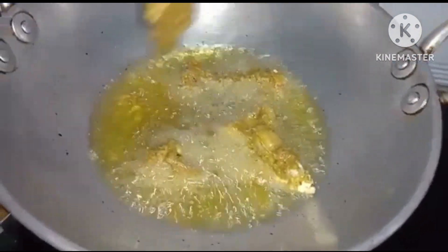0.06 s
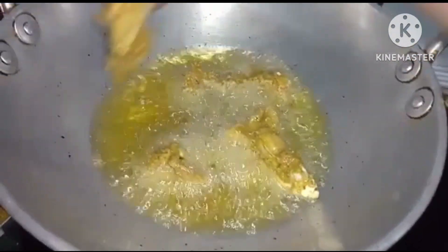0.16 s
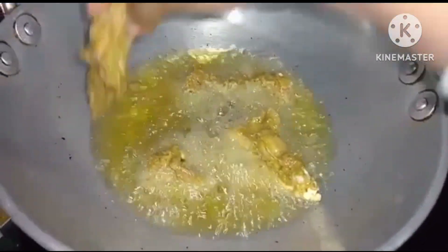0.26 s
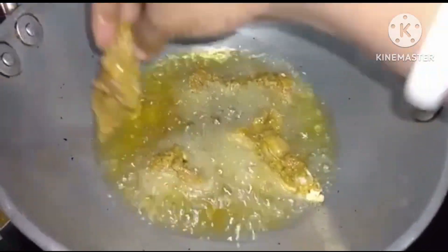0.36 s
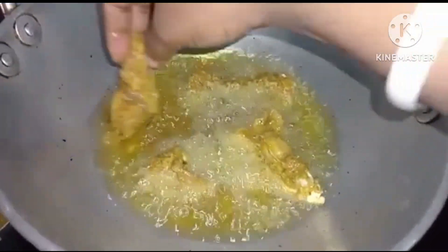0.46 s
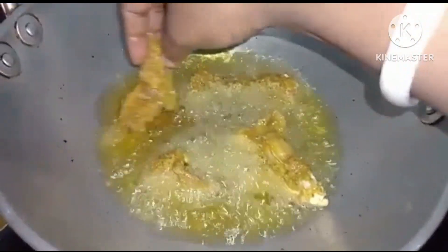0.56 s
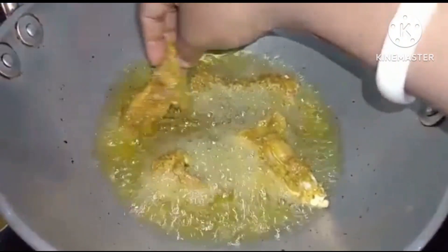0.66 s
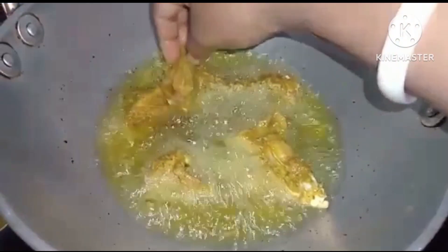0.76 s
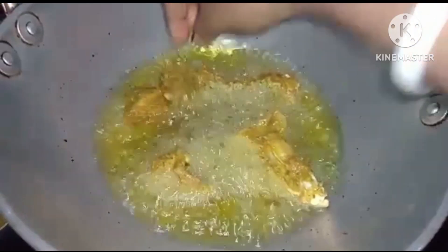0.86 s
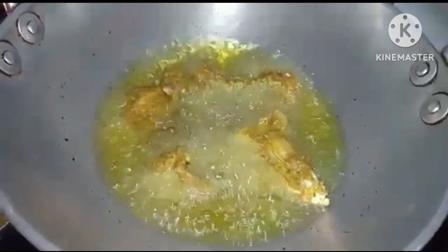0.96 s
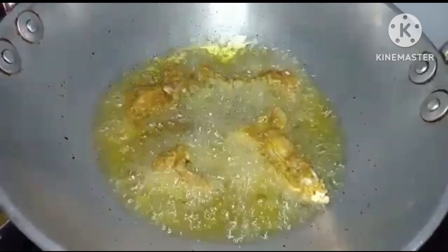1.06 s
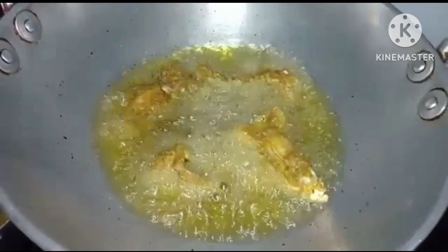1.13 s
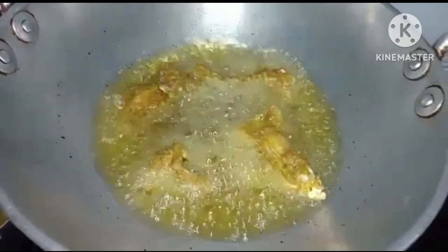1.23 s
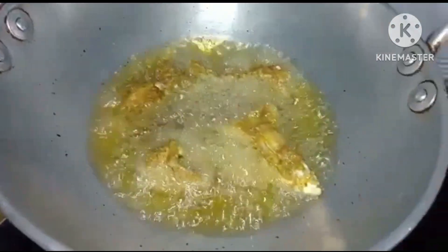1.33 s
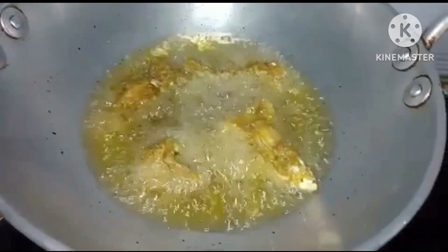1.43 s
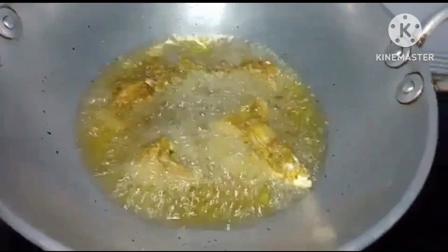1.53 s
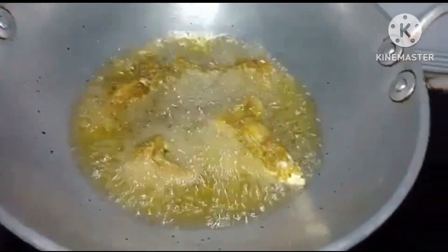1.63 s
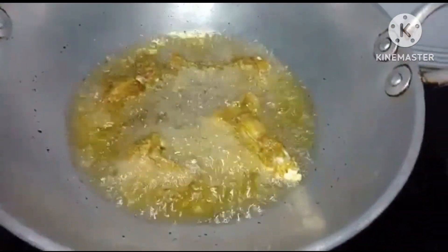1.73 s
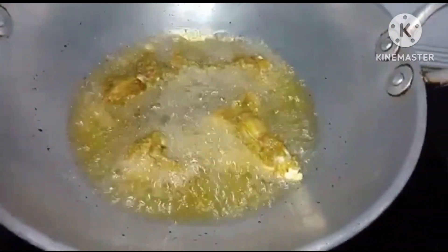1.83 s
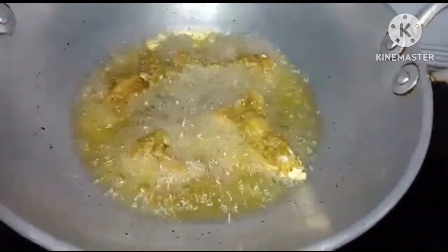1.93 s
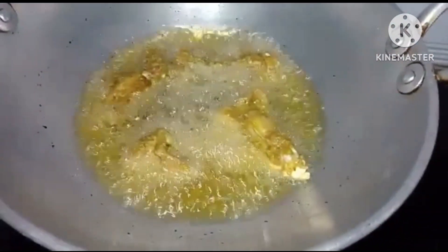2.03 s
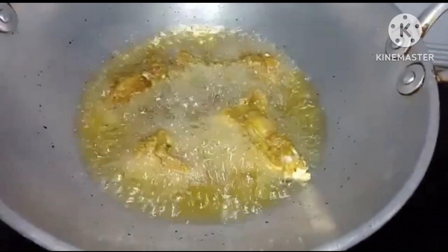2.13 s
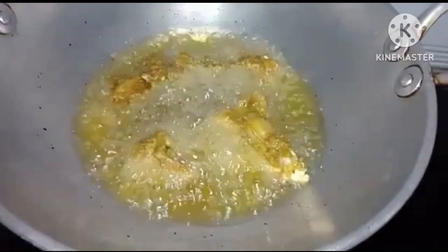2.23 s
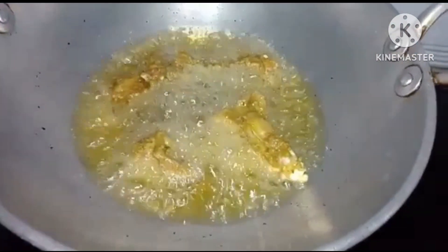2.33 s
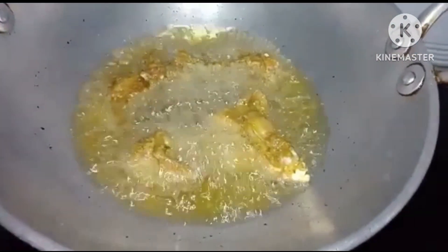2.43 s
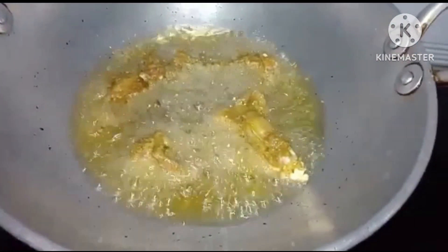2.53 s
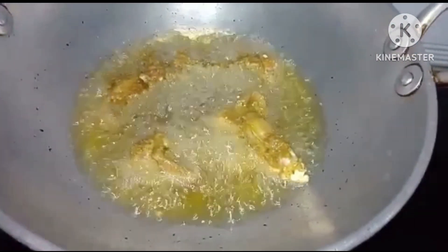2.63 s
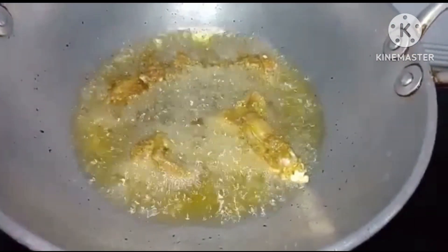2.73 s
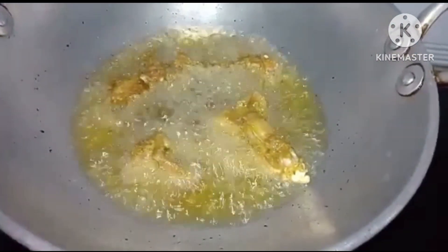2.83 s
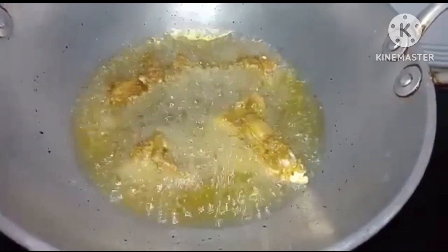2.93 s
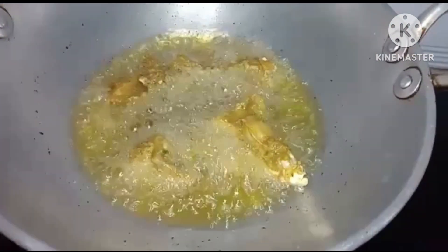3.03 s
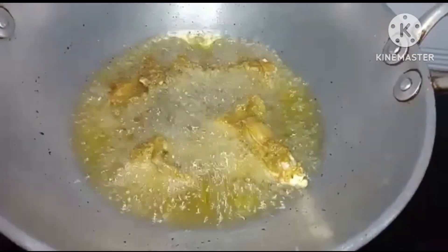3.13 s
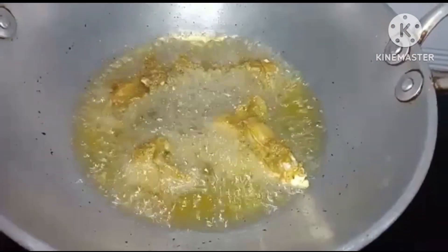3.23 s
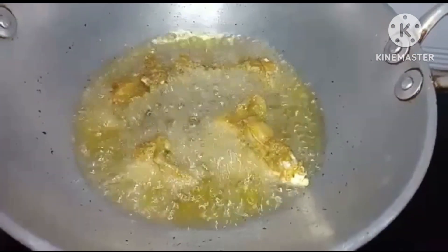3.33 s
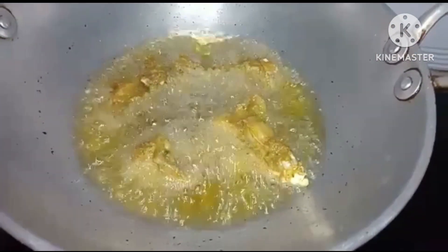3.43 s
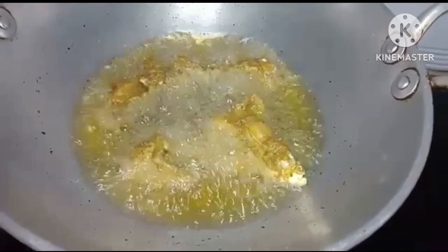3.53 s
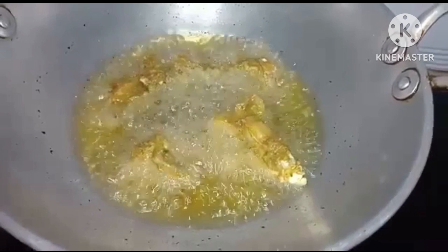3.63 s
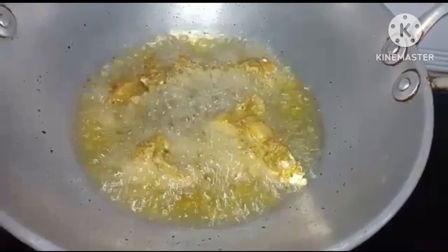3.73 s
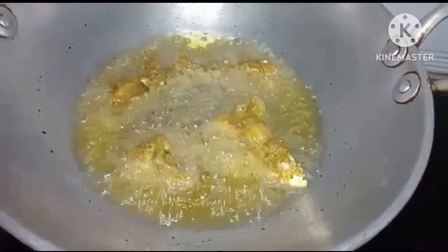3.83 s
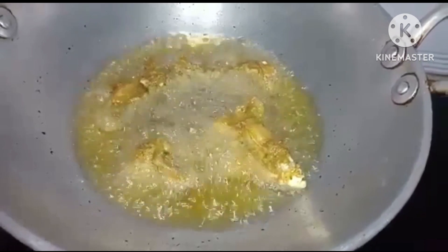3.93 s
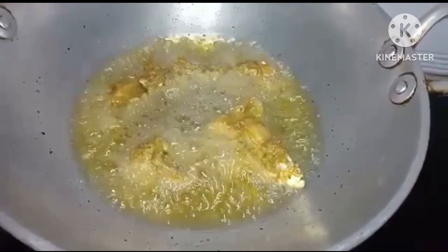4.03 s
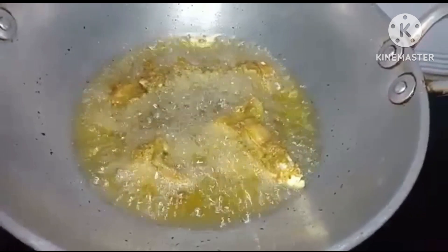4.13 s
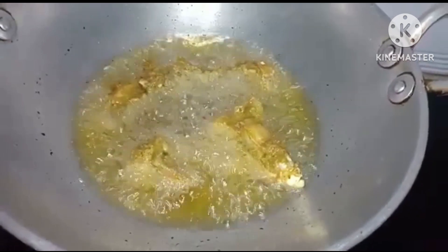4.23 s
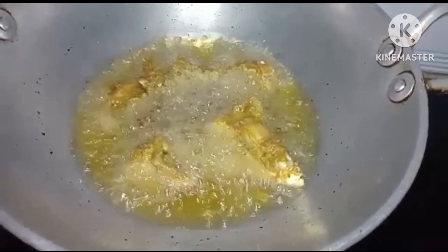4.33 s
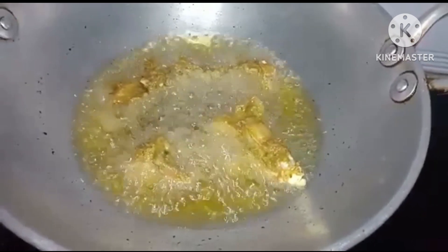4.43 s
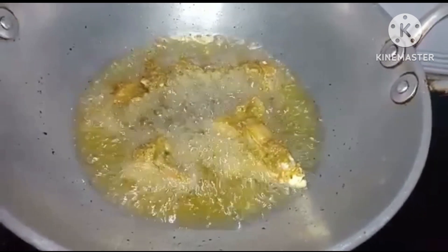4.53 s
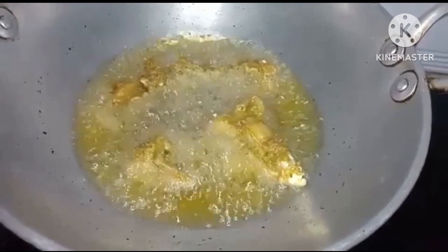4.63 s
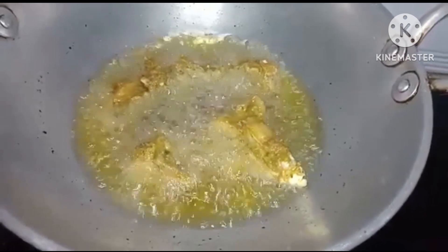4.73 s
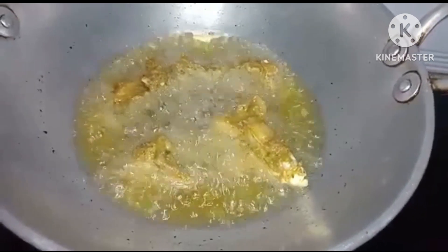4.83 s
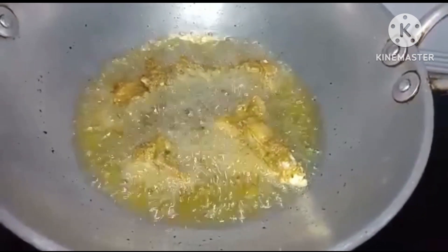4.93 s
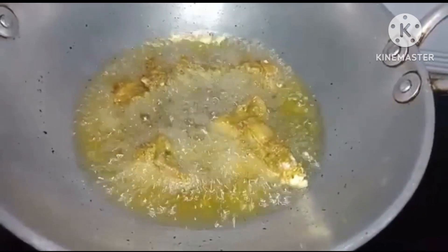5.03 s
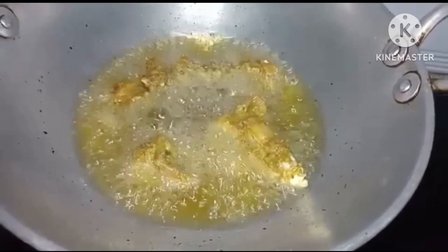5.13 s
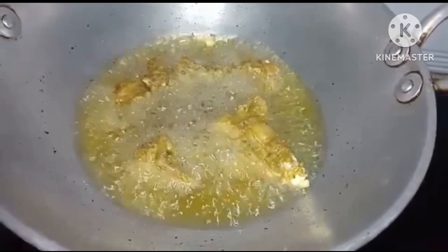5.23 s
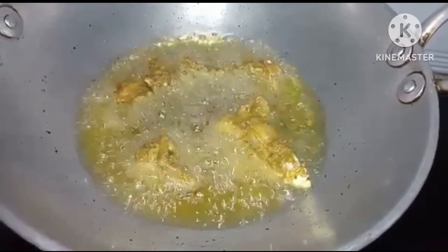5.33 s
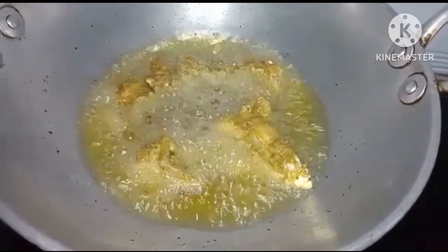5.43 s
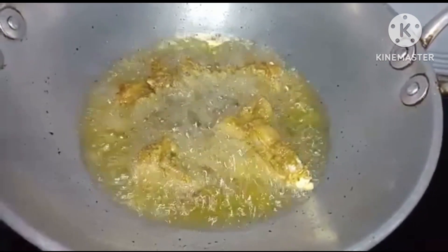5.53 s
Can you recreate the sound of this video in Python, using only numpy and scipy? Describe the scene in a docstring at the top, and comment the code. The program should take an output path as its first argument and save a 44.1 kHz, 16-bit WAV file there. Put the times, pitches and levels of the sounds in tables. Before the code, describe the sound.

Chicken pieces fry in hot oil in a metal wok with dense, bright sizzling and crackling, surging as a fresh piece goes in.

```python
"""A small kitchen, close to a metal wok: chicken fries, and a fresh piece laid in at half a second makes the sizzle surge.
Steam bubbles burst in the oil: countless tiny ones are filtered clicks that crackle, larger ones are gliding pings,
and now and then a water drop spits. Dense grains make the steam's sputter. The boiling keeps the wok's modes humming
faintly, and it takes a few dull knocks. Close walls add a short tail; the phone microphone limits the loudest pops."""
import sys
import numpy as np
from scipy import signal
from scipy.fft import rfft, irfft
from scipy.io import wavfile
from scipy.ndimage import uniform_filter1d, minimum_filter1d

SR = 44100
rng = np.random.default_rng(int(sys.argv[2]) if len(sys.argv) > 2 else 0)


def waveform_to_disk(signal):
    """Save audio, clipped to [-1, 1], as 16-bit WAV at the path in sys.argv[1]."""
    frames = np.transpose(np.atleast_2d(signal))
    scaled = np.clip(frames, -1, 1) * 32767
    samples = np.round(scaled).astype(np.int16)
    wavfile.write(sys.argv[1], SR, samples)


N = 246519
TIME = np.arange(N) / SR

# Low background of stove and kitchen: (frequency [Hz], relative level [dB])
KITCHEN_COLOUR = [(25, -1), (55, -3.5), (90, -3), (130, 2), (210, -8.5), (320, 9.5), (420, -1), (600, 8),
                  (1200, -12.5), (3000, -8)]
# Ringing modes of the wok: (frequency [Hz], relative level [dB], decay by 60 dB [s])
WOK_MODES = [(123, -11.5, 0.28), (159.3, -9.5, 0.44), (318, -7.5, 0.25), (415.3, 4, 0.25), (550, -20, 0.15),
             (705, -0.5, 0.13), (814, -15, 0.13), (876, 5.5, 0.13), (1130, -11, 0.36)]
# Dull body of a knock: (frequency [Hz], relative level [dB])
THUD_COLOUR = [(30, -5), (100, -26), (400, 6), (1100, -2), (1400, -26), (6000, -57)]
# Dull knocks on the wok: (time [s], relative level [dB], contact time [ms])
WOK_KNOCKS = [(0.925, -41, 6.3), (0.974, -47, 6.7), (3.011, -45, 5.4), (3.666, -45.5, 1.6),
              (4.312, -46, 0.49), (4.427, -34, 0.66)]
# Swells of the wok's singing mode, before their random spread: (time [s], level [dB])
SINGING_LEVEL = [(0, -56), (0.8, -38.5), (1.3, -42), (1.7, -54.5), (2.2, -36), (2.5, -55), (3.95, -42.5),
                 (4.5, -60), (5.59, -43.5)]
# Wide, low bubbles gulping at the edge of the meat: (time [s], pitch [Hz], peak level [dB])
EDGE_GULPS = [(0.198, 1520, -36.5), (.212, 1160, -43), (1.505, 1184, -43.5), (2.995, 1470, -36),
              (3.003, 2070, -32.5), (4.835, 1840, -39)]
# Water drops spitting: (time [s], relative level [dB])
WATER_SPITS = [(0.379, -23), (1.749, -17), (1.778, -31), (2.673, -18), (2.775, -23), (2.817, -27),
               (3.4, -24), (4.615, -22), (4.782, -27)]
# Colour of a spit: (frequency [Hz], relative level [dB])
SPIT_COLOUR = [(500, -26), (2000, -10), (3200, 0), (6000, -2), (8000, -6), (10000, -2), (12500, -4),
               (15500, -6)]
# Loudest steam bubbles bursting: (time [s], pitch [Hz], relative ring level [dB], relative spray level [dB])
LOUD_POPS = [(0.078, 4200, -15.5, -22), (0.11, 6570, -24, -36), (0.137, 3480, -17, -24),
             (0.15, 4910, -16.5, -39), (0.273, 4630, -18, -28), (0.381, 4920, -17, -34),
             (0.393, 4520, -14, -30), (0.406, 3680, -12, -17.5), (0.468, 3410, -16.5, -28),
             (0.589, 2650, -15.5, -17.5), (0.605, 4280, -20, -19), (0.779, 3810, -13, -24),
             (0.869, 4980, -11.5, -22.5), (0.895, 4230, -14.5, -37), (1.01, 5620, -11, -31),
             (1.103, 3080, -17, -25.5), (1.295, 2794, -15.5, -29), (1.601, 4440, -23, -34),
             (1.721, 3070, -9, -30), (1.75, 3370, -17, -32), (1.828, 4060, -27, -32),
             (2.041, 5600, -18.5, -29), (2.179, 2820, -17, -24.5), (2.197, 4410, -16, -35),
             (2.358, 4190, -21.5, -52), (2.475, 6300, -18.5, -20), (2.715, 3040, -14, -22),
             (2.962, 6030, -27, -30.5), (3.144, 3970, -13.5, -25.5), (3.183, 5400, -28, -21.5),
             (3.389, 3490, -27, -26.5), (3.526, 5370, -15.5, -26.5), (3.857, 3290, -23, -48),
             (4.131, 2830, -10.5, -49), (4.223, 6630, -25.5, -24), (4.311, 4910, -17.5, -21.5),
             (4.45, 3680, -18, -19.5), (4.545, 3100, -17, -24.5), (4.645, 3580, -25.5, -32),
             (4.87, 4260, -22, -32.5), (4.885, 2940, -13, -42), (4.955, 4090, -27, -32),
             (5.217, 3030, -20.5, -45), (5.247, 3340, -21.5, -28), (5.295, 6220, -19.5, -49),
             (5.537, 2720, -18, -42)]
# Colour of the sputter and of a pop's spray: (frequency [Hz], relative level [dB])
SPUTTER_COLOUR = [(1000, -40), (1900, -30), (2600, 3), (3600, 4), (4700, 8.5), (5800, 0.5), (6600, 1),
                  (7300, -8), (8200, -14), (15000, -46)]
# Gushes of steam as the wet piece sinks in: (time [s], relative level [dB])
STEAM_GUSHES = [(0.485, -21), (0.68, -22), (0.945, -25)]
# Size classes of the tiny bursts: (low edge [Hz], high edge before the cap in crackle [Hz], size spread [dB])
FOAM_CLASSES = [(100, 8140, 3.5), (7400, 14200, 5), (12500, 22000, 5.5)]
# Colour of the crackle: (frequency [Hz], relative level [dB])
CRACKLE_COLOUR = [(100, -48), (600, -21), (1200, -18.5), (2000, -8.5), (2500, -2), (3000, 3.5),
                  (3800, -4.5), (4700, -7), (6500, -22.5), (8200, -24.5), (10100, -9.5), (12300, -29),
                  (13800, -36), (15200, -23.5)]

# The lesser pops fall at random; ring and spray levels are relative, like those of the loud pops
LESSER_LOW_HZ, LESSER_HIGH_HZ = 2654, 6830
LESSER_DB, LESSER_SPRAY_DB, LESSER_SPREAD_DB = -27.5, -36.5, 5
# The fine crackle peaks once the fresh piece is in, then eases as the oil cools (relative level)
BOIL_DB, BOIL_PEAK_S, BOIL_RISE_DB_PER_S, BOIL_FALL_DB_PER_S = -44, 0.63, 7, 1.39
GUSH_ATTACK_S, GUSH_DECAY_S = 0.021, 0.09
DRYING_DB, DRYING_S = -12, 1.0  # what remains of a gush while the surface of the meat dries
STEAM_DB = -43.5  # relative level of the steady sputter of pieces already frying
TOP_HZ = 15600  # top of the microphone's range


def undb(db):
    """Decibels to gain."""
    return 10 ** (np.asarray(db) / 20)


def unit(x):
    """Scale to rms 1."""
    return x / np.sqrt(np.mean(x ** 2))


def curve(table, axis=1):
    """One column of a control table, joined by straight lines."""
    rows = np.array(table)
    return np.interp(TIME, rows[:, 0], rows[:, axis])


def add(out, s, sound):
    """Mix a sound in at time s."""
    start = min(max(int(s * SR), 0), N)
    out[start:start + len(sound)] += sound[:N - start]


def colour(x, points, size=1024):
    """Causal, minimum-phase filter with the given (Hz, dB) response."""
    hz, db = np.transpose(points)
    grid = np.maximum(np.arange(size // 2 + 1) * SR / size, 1)
    response_db = np.interp(np.log(grid), np.log(hz), db)
    cepstrum = irfft(np.log(undb(response_db)))
    # folding the cepstrum forward puts the energy as early as possible
    cepstrum[1:size // 2] *= 2
    cepstrum[size // 2 + 1:] = 0
    impulse = irfft(np.exp(rfft(cepstrum)))
    return signal.oaconvolve(x, impulse)[:len(x)]


def walk(rate, size=2048):
    """A random wander with a spread near 1: straight lines between `rate` random points a second."""
    return np.interp(TIME * rate, np.arange(size), rng.standard_normal(size))


def clicks(spread_db, count):
    """Randomly timed bursts of very unequal size and random sign."""
    when, size, sign = rng.random((count, 3)).T
    height = undb(spread_db * np.minimum(-np.log(size), 6.5)) * np.sign(sign - .5)
    return np.bincount((when * N).astype(int), height, N)


def ping(hz, cycles, glide, rise_s=0.0018):
    """A burst bubble's cavity rings for some cycles; its pitch rises as the hole opens."""
    life = cycles / hz
    t = TIME[:int(5 * life * SR)]
    swell = (1 - np.exp(-t / rise_s)) * np.exp(-(t / life) ** 1.21)
    pitch = hz * (1 + glide * (np.tanh(t / life) - .5))
    phase = 2 * np.pi * np.cumsum(pitch) / SR
    return swell / swell.max() * np.sin(phase)


def boil():
    """How hard the oil boils, in dB: a short rise, then a slow fall."""
    since = TIME - BOIL_PEAK_S
    return BOIL_DB + np.minimum(BOIL_RISE_DB_PER_S * since, -BOIL_FALL_DB_PER_S * since)


def kitchen(level_db=-61.5):
    """The low background of stove and kitchen is steady coloured noise."""
    noise = colour(rng.standard_normal(N), KITCHEN_COLOUR, size=8192)
    return undb(level_db) * unit(noise)


def wok(boil_db=-62, swell_db=6, thud_db=-1, thud_s=0.031):
    """The wok's modes ring under knocks and, faintly, under the boiling oil, where each swells on its own."""
    t = TIME[:SR]
    modes = [undb(db) * np.cos(2 * np.pi * hz * t) * undb(-60 * t / t60) for hz, db, t60 in WOK_MODES]
    thud = unit(colour(rng.standard_normal(SR), THUD_COLOUR)) * np.exp(-t / thud_s)
    blows = np.zeros(N)
    for s, db, contact_ms in WOK_KNOCKS:
        push = np.hanning(max(int(contact_ms * SR / 1000), 3))
        add(blows, s, undb(db) * push / push.sum())
    knocks = signal.oaconvolve(blows, sum(modes) + undb(thud_db) * thud)[:N]
    hum = np.zeros(N)
    for mode in modes:
        drive = rng.standard_normal(N) * undb(swell_db * walk(12))
        hum += signal.oaconvolve(drive, mode)[:N]
    return knocks + undb(boil_db) * unit(hum)


def singing(hz=892, width_hz=35, steady_db=-59, swell_s=0.082, spread_db=3, waver=0.01174, count=26):
    """One narrow mode of the bowl sings under the boil; now and then it swells for a moment."""
    b, a = signal.iirpeak(hz, hz / width_hz, fs=SR)
    steady = undb(steady_db) * unit(signal.lfilter(b, a, rng.standard_normal(N)))
    swells = np.zeros(N)
    for k, (when, length, size) in enumerate(rng.random((count, 3))):
        swell = np.hanning(int(swell_s * (.5 + length) * SR))
        add(swells, (k + when) / count * TIME[-1], undb(spread_db * (2 * size - 1)) * swell)
    phase = 2 * np.pi * np.cumsum(hz * (1 + waver * walk(40))) / SR
    return steady + undb(curve(SINGING_LEVEL)) * swells * np.sin(phase)


def simmer(low_hz=650, high_hz=2000, cycles=14, spread_db=2.0, tilt_db=5, count=400):
    """Slow, soft bubbling from deep in the oil: low pings with a gentle onset."""
    out = np.zeros(N)
    for when, pitch, size in rng.random((count, 3)):
        db = spread_db * min(-np.log(size), 3.0) + tilt_db * pitch
        hz = low_hz * (high_hz / low_hz) ** pitch
        add(out, when * N / SR, undb(db) * ping(hz, cycles, 0.051, rise_s=0.0085))
    return unit(out)


def gulps(cycles=12, again_db=-5, again_s=0.02, count=3):
    """Wide bubbles ring lower and softer, and wobble again as they collapse."""
    out = np.zeros(N)
    for (s, hz, db), chance in zip(EDGE_GULPS, rng.random((len(EDGE_GULPS), count, 2))):
        add(out, s, undb(db) * ping(hz, cycles, 0.044))
        for lag, pitch in chance:
            wobble = ping(hz * (.85 + .3 * pitch), cycles / 2, 0.035)
            add(out, s + again_s * (0.25 + lag), undb(db + again_db) * wobble)
    return out


def spits(hiss_db=-6, hiss_s=0.0035):
    """A water drop flashes to steam with one sharp crack and a brief hiss."""
    out, t = np.zeros(N), TIME[:SR // 20]
    crack = t == 0  # a single-sample impulse
    for s, db in WATER_SPITS:
        hiss = rng.standard_normal(len(t)) * np.exp(-t / hiss_s)
        add(out, s, undb(db) * (crack + undb(hiss_db) * hiss / np.linalg.norm(hiss)))
    return colour(out, SPIT_COLOUR)


def lesser_pops(count=56):
    """Rows like those of the loud pops, at random moments and weaker as the boil eases."""
    when, pitch, size, wetness = rng.random((count, 4)).T
    s = (np.arange(count) + when) / count * TIME[-1]
    level = boil()
    vigour_db = np.interp(s, TIME, level - level.mean())
    hz = LESSER_LOW_HZ * (LESSER_HIGH_HZ / LESSER_LOW_HZ) ** pitch
    db = LESSER_DB + vigour_db + LESSER_SPREAD_DB * (2 * size - 1)
    spray_db = LESSER_SPRAY_DB + vigour_db + LESSER_SPREAD_DB * (2 * wetness - 1)
    return list(zip(s, hz, db, spray_db))


def pops(cycles=9, glide=0.062, rings_db=3, spray_db=4, spray_s=0.0058,
         follow_db=-9, follow_s=0.0087, scatter=0.11, count=3):
    """Each large bubble pings, sets off a few neighbours of like size, and its torn film sprays a rough fizz."""
    rings, spray = np.zeros(N), np.zeros(N)
    bubbles = LOUD_POPS + lesser_pops()
    for (s, hz, db, fizz_db), chance in zip(bubbles, rng.standard_normal((len(bubbles), count, 2))):
        add(rings, s, undb(db) * ping(hz, cycles, glide))
        for lag, pitch in chance:
            neighbour_hz = np.clip(hz * np.exp(scatter * pitch), 2400, 7300)
            neighbour = ping(neighbour_hz, 0.58 * cycles, glide)
            add(rings, s + follow_s * (.2 + abs(lag)), undb(db + follow_db) * neighbour)
        add(spray, s, undb(fizz_db) * np.exp(-TIME[:SR // 20] / spray_s))
    grains = clicks(0.76, count=60000)
    fizz = colour(spray * grains, SPUTTER_COLOUR) / np.std(colour(grains, SPUTTER_COLOUR))
    return undb(rings_db) * rings + undb(spray_db) * fizz


def small_bubbles(low_hz=2600, high_hz=7000, cycles=7, spread_db=1.5, tilt_db=-3, cluster_db=5, count=1000):
    """Small steam bubbles ping in clusters along the crust, the highest ones tending to be weakest."""
    out = np.zeros(N)
    for when, pitch, size, shape in rng.random((count, 4)):
        db = spread_db * min(-np.log(size), 3.0) + tilt_db * pitch
        hz = low_hz * (high_hz / low_hz) ** pitch
        add(out, when * N / SR, undb(db) * ping(hz, cycles * (.5 + shape), 0.072, rise_s=0.00056))
    clusters = np.minimum(walk(30), 1)
    return unit(out) * undb(boil() + cluster_db * clusters)


def steam(grain_db=1.0, flutter_db=4.5):
    """Moisture boils out of the meat in a dense, fluttering sputter; each gush drops quickly, then dries slowly."""
    power = undb(STEAM_DB) ** 2
    for s, db in STEAM_GUSHES:
        age = np.maximum(TIME - s, 0)
        attack = np.minimum(age / GUSH_ATTACK_S, 1)
        release = np.exp(-age / GUSH_DECAY_S) + undb(DRYING_DB) * np.exp(-age / DRYING_S)
        power = power + (undb(db) * attack * release) ** 2
    sputter = unit(colour(clicks(grain_db, count=25000), SPUTTER_COLOUR))
    return sputter * np.sqrt(power) * undb(flutter_db * walk(90))


def crackle(flutter_db=2.0):
    """Countless tiny bursts; each size class crackles on its own in its own band."""
    out = np.zeros(N)
    for low_hz, high_hz, spread_db in FOAM_CLASSES:
        edges = [low_hz, min(high_hz, .45 * SR)]  # capped below half the sample rate
        band = signal.butter(4, edges, "bandpass", fs=SR, output="sos")
        out += signal.sosfilt(band, unit(clicks(spread_db, count=45000)))
    return unit(colour(out, CRACKLE_COLOUR)) * undb(boil() + flutter_db * walk(25.105))


def room(x, wet_db=-5, t60=0.14, gap_s=0.0011, count=3):
    """Close reflections; the sound wanders between spots in the wok, and each spot has its own echoes."""
    t = TIME[:SR // 5]
    spots = np.array([walk(70) for _ in range(count)])
    spots /= np.sqrt(np.sum(spots ** 2, axis=0))  # the shares keep a constant total power
    out = x
    for share in spots:
        decay = np.exp(-np.log(1000) * t / t60)
        tail = rng.standard_normal(len(t)) * decay * np.clip(t / gap_s - 1, 0, 1)
        out = out + undb(wet_db) * signal.oaconvolve(x * share, tail / np.linalg.norm(tail))[:N]
    return out


def limiter(x, top_db=-15.0, ratio=3, release_s=0.053, size=260):
    """The gain drops just ahead of a loud peak and recovers quickly; size is the look-around in samples."""
    peak = -minimum_filter1d(-np.abs(x), size)
    # a running maximum on a tilted log scale holds each peak and lets it decay exponentially
    fall = TIME / release_s
    held = np.exp(np.maximum.accumulate(np.log(peak + 1e-9) + fall) - fall)
    gain = np.minimum(undb(top_db) / held, 1) ** (1 - 1 / max(ratio, 1))
    return x * uniform_filter1d(gain, size)


def scene():
    """The oil heard in the room, over the wok and the low background."""
    background = kitchen() + singing() + wok()
    bursts = gulps() + undb(14) * spits() + pops()
    sizzle = undb(-60.0) * simmer() + undb(3.0) * small_bubbles() + undb(-5.5) * steam() + undb(11.0) * crackle()
    return (background + room(bursts + sizzle))[None]


def record(dry):
    """The phone microphone limits the peaks and cuts the top."""
    top_cut = signal.ellip(10, .2, 70, TOP_HZ, fs=SR, output="sos")
    return signal.sosfilt(top_cut, limiter(dry[0]))[None]


dry = scene()
out = record(dry)
waveform_to_disk(out)
```